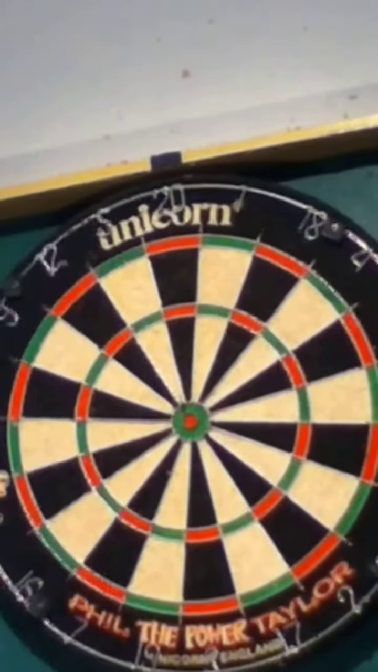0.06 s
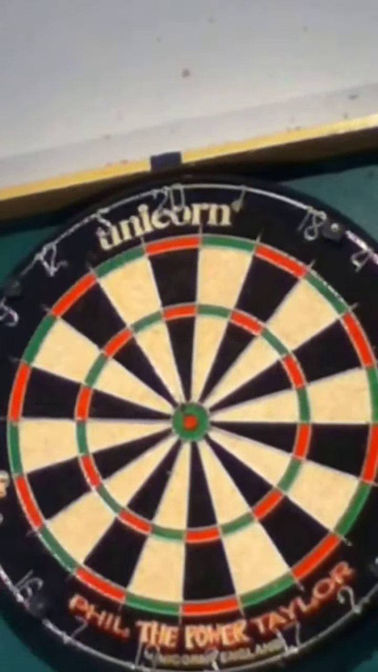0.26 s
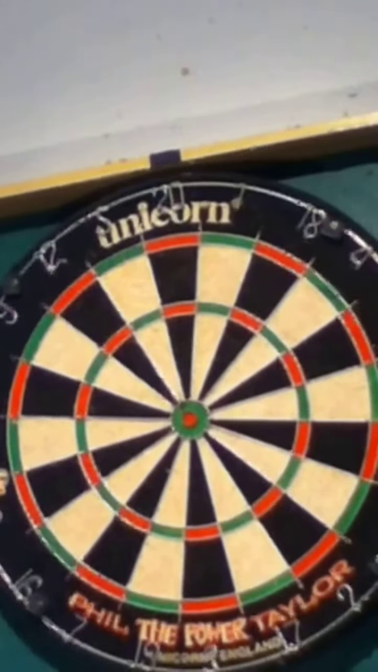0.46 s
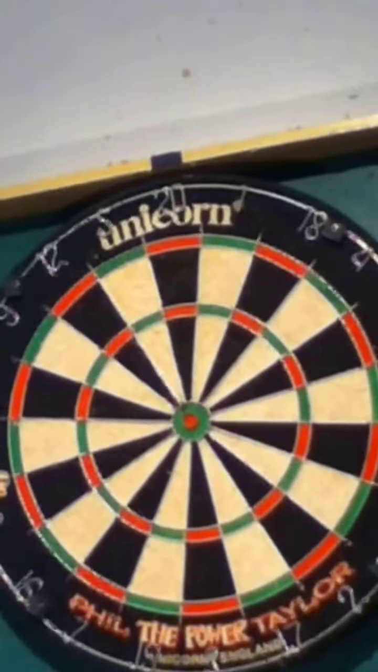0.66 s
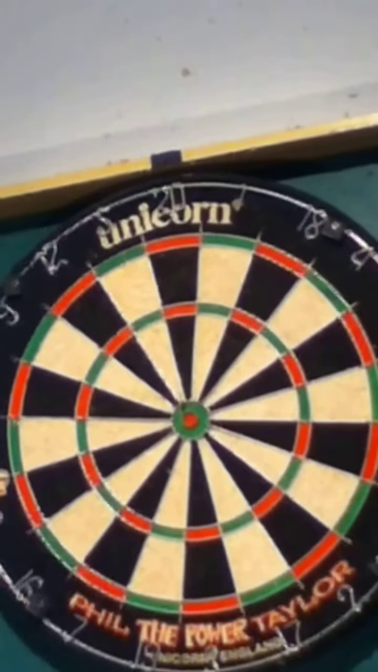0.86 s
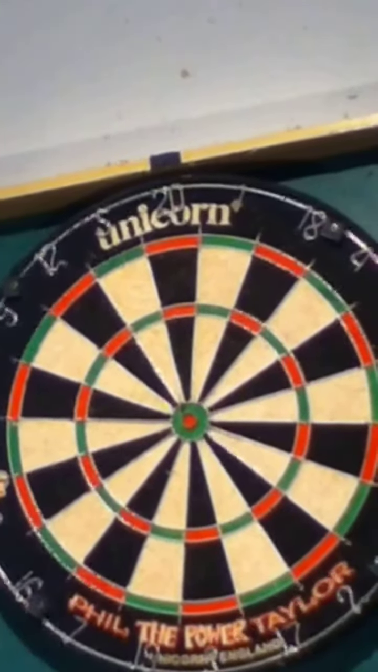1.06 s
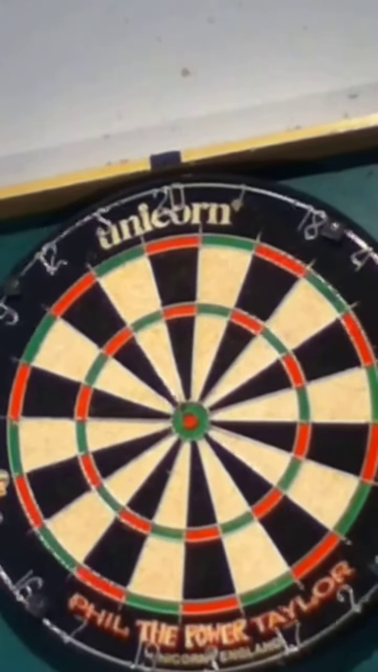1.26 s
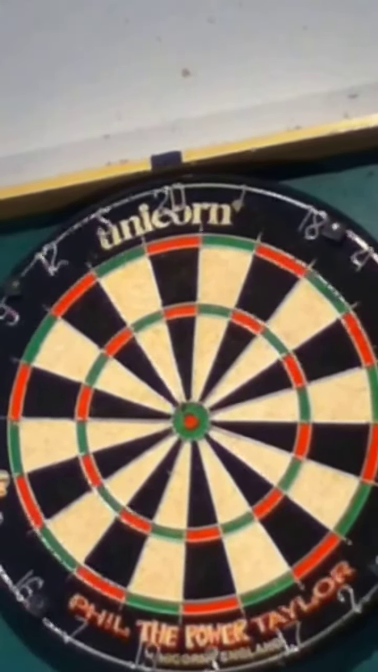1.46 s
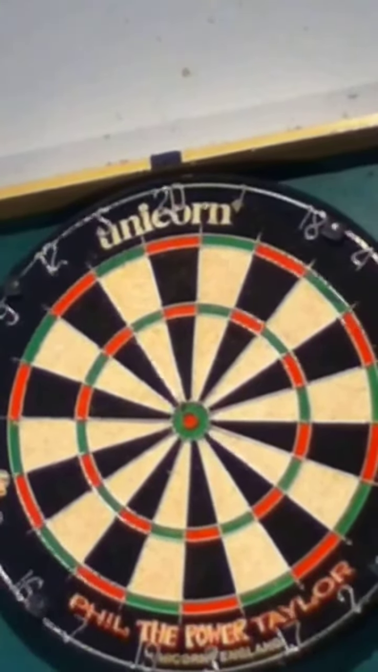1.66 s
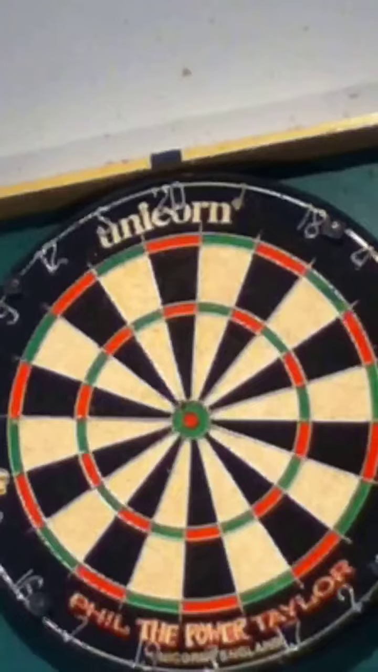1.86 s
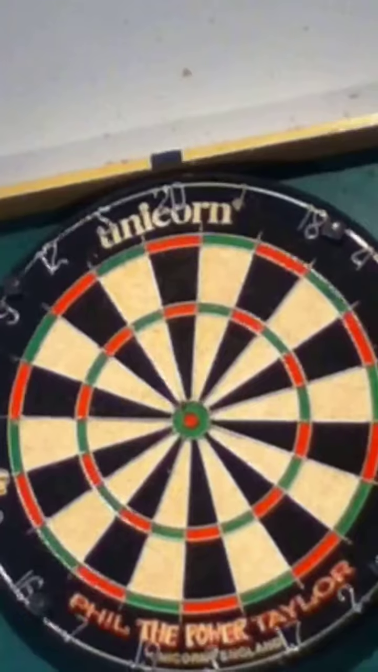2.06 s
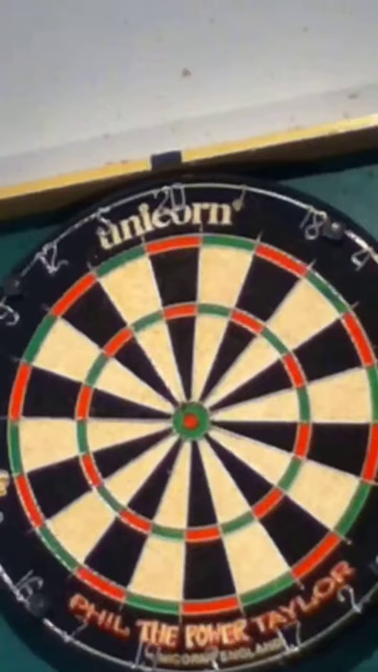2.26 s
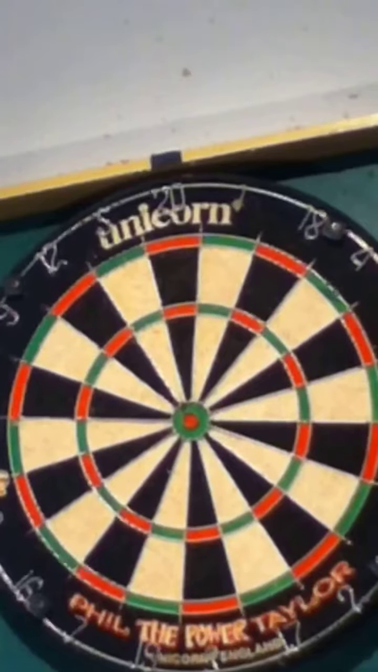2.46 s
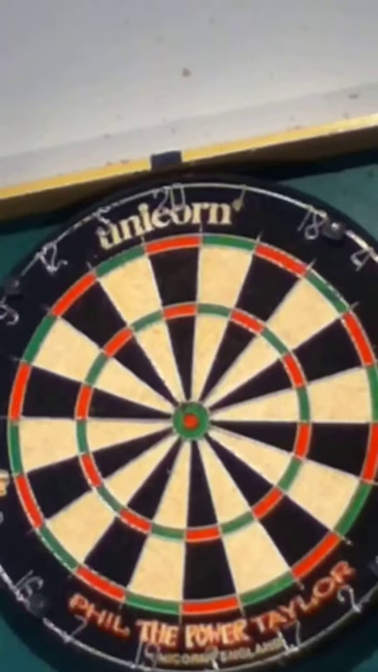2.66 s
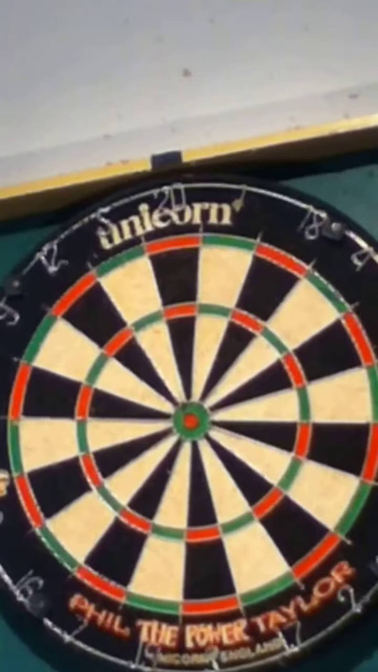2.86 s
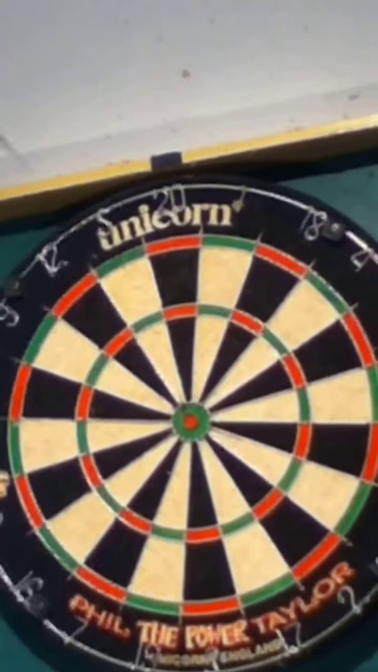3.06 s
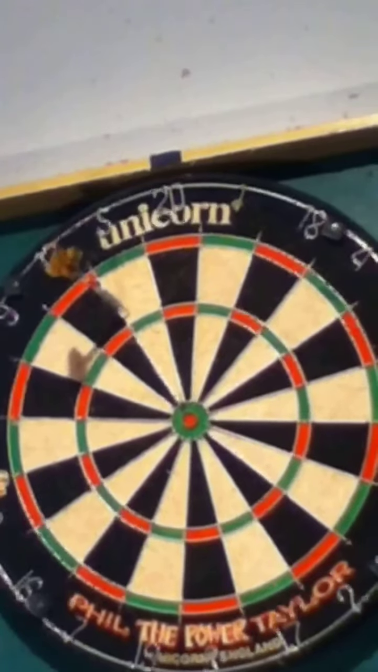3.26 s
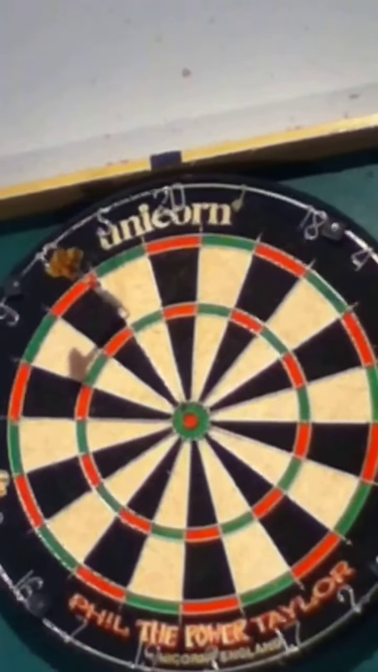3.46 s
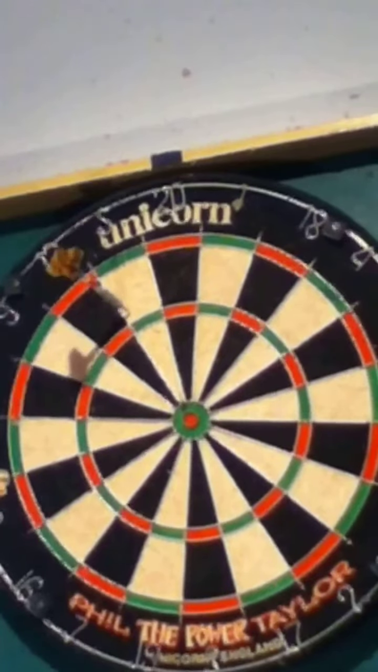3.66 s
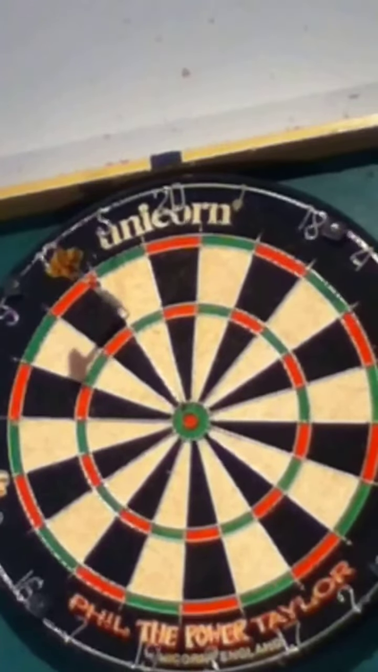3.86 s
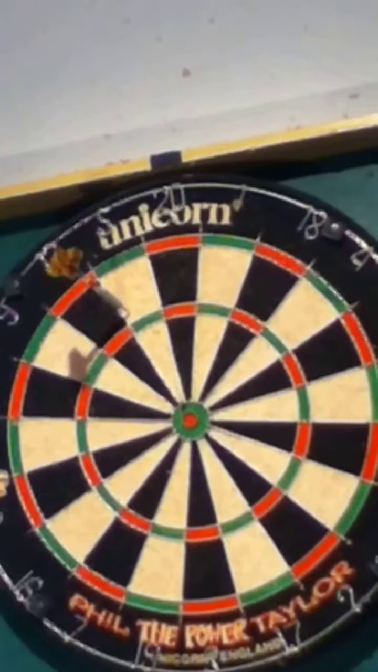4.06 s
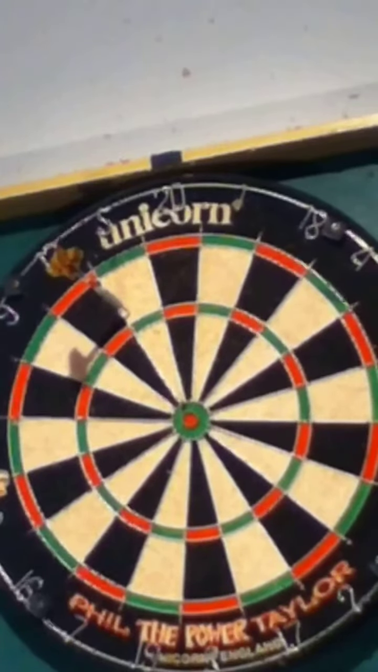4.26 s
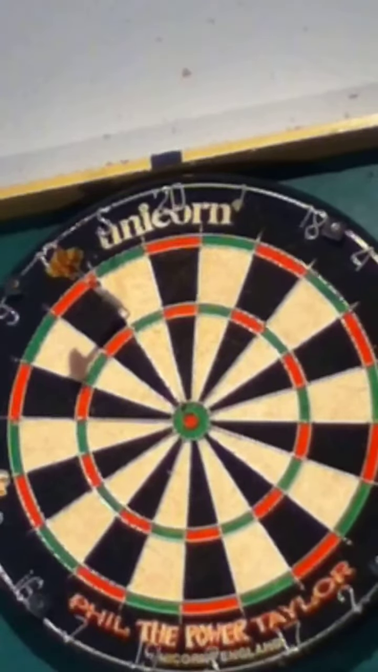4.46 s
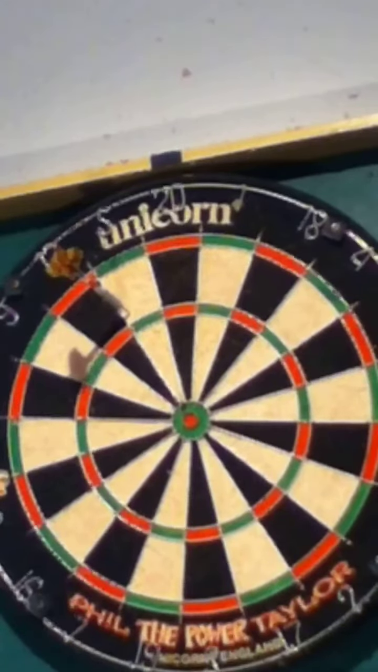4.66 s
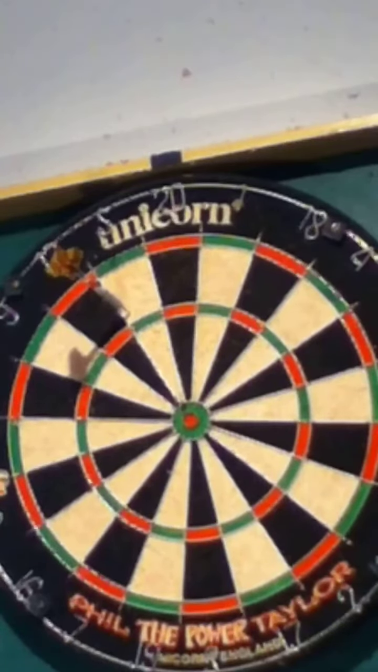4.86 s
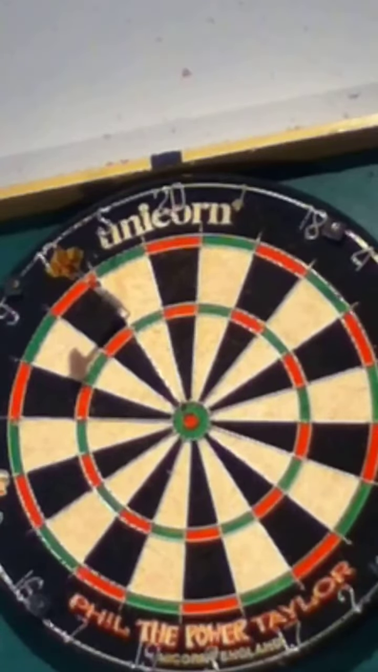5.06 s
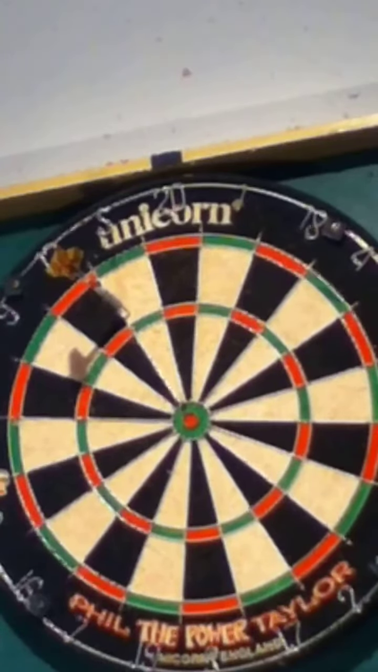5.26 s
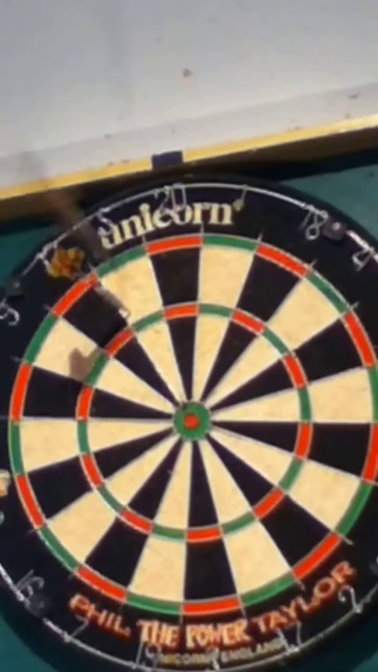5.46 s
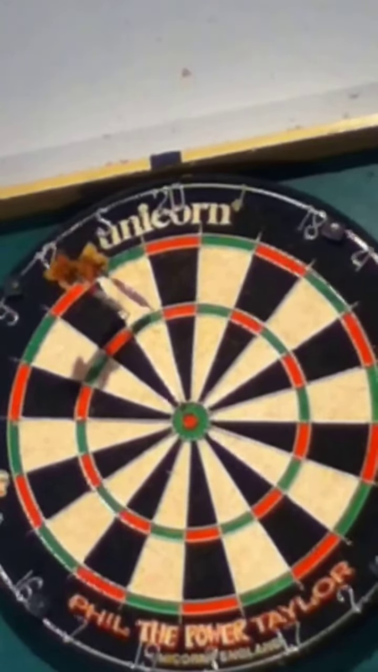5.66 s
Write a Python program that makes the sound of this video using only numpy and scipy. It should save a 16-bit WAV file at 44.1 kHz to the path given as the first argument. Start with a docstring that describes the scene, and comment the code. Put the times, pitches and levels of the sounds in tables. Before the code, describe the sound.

A small home room with one microphone and a steady soft hiss. Spare darts clink faintly while a sole shuffles on the floor. Dull heel thumps follow in the quiet. A dart hits the bristle board with a short crackling knock, then a light clink. After a pause, a stamp leads straight into a louder, brighter metallic clatter as the next dart strikes the one already there. Short room echo follows.

```python
"""A small room at home, where darts are thrown at a bristle board, heard by one microphone.
One dart crackles into the board, the next clatters against it: uneven clicks, then a blow that rings the board.
Spare darts clink in the hand (struck ringing tones); the thrower stamps (pressure swings and slaps) and
shuffles (grainy friction noise), with soft rustles of cloth. The room answers with a few clear echoes and
a short tail of fading noise, over a steady hiss."""
import sys
import numpy as np
from scipy import signal
from scipy.fft import rfft, irfft
from scipy.io import wavfile

SR = 44100
rng = np.random.default_rng(int(sys.argv[2]) if len(sys.argv) > 2 else 0)


def natural_amplitude(level_db):
    """Convert a level in decibels to a linear amplitude factor, elementwise."""
    exponent = np.asarray(level_db, float) / 20
    return 10 ** exponent


def to_wav(s):
    """Save 16-bit WAV."""
    ch = np.atleast_2d(s).T  # columns
    pcm = np.round(np.clip(ch, -1, 1) * 32767)  # PCM
    wavfile.write(sys.argv[1], SR, pcm.astype(np.int16))


N = 252252  # length of the scene in samples

# Darts landing: first_touch_s, crackle_db, time_to_full_stop_ms, thump_db, thump_contact_ms
DART_LANDINGS = [(3.259, -27, 4.0, -21.5, 0.86), (5.614, -13.5, 1.01, -23.5, 0.71)]
# Crackle of a point going into the fibres: pitch_hz, level_db (per Hz)
FIBRE_COLOUR = [(500, -23), (1000, -1.5), (2000, -7.5), (2300, -19), (2620, -5.5), (3300, -21.5),
                (4400, -16.5), (6000, -27), (7500, -15.5), (9000, -20), (12000, -29), (16000, -40)]
# Crackle of barrel on barrel: pitch_hz, level_db (per Hz)
CLATTER_COLOUR = [(410, -22), (700, -5.5), (748, -14.5), (1290, 1), (2150, -7.5), (3420, -8.5),
                  (4170, -5.5), (5220, -13), (7560, -4), (15200, -22), (16500, -60)]
# Ringing tones of the board and its backing: pitch_hz, level_db, fall_by_60_db_s
BOARD_TONES = [(262.2, -11, 0.39), (335, -9, 0.13), (400, -31, .06), (462.6, 2.5, 0.1), (498, -12, 0.088),
               (718, -2, 0.061), (960, -17, 0.072), (1160, -8, 0.042), (1240, -8, .04), (1630, -7, .03),
               (2040, -10, 0.023), (2600, -4, 0.055), (4450, -15, .03)]

# Clinks of dart against dart, and at 5.6097 s a faint, soft tick just ahead of the loud clash:
# start_s, level_db, clink_place (0-1 along the barrel), room_db
DART_CLINKS = [(0.1278, -33, 0.33, -27), (0.1345, -40, .15, -31), (.149, -29.5, .8, -35),
               (0.1593, -31, .78, -38), (.46, -25.5, 1, -31), (0.4643, -32, 1, -36), (3.092, -49, 0.2, -23),
               (3.097, -42.5, 0.27, -24), (3.5847, -31.5, 0.76, -30), (3.592, -38.5, 0.38, -27),
               (5.1669, -50, 0.56, -25), (5.6097, -45, .6, -26), (5.6143, -15.5, .8, -28),
               (5.6176, -20.5, 0.57, -26.5)]
# Ringing tones of a metal dart: pitch_hz, level_db, fall_by_60_db_s,
# swing_place (0-1 along the barrel, where the tone swings most)
DART_TONES = [(1560, 0, 0.022, 0.02), (1900, -5, 0.022, 0.32), (3470, -3, 0.017, 0.14),
              (3990, -1.5, 0.013, 0.38), (4420, 1.5, 0.013, 0.69), (4860, 3.5, 0.0034, 0.48),
              (5530, 1, 0.0064, 0.44), (7070, 2, 0.0059, 0.77), (7780, -1, 0.011, 0.62),
              (8430, -3, 0.017, 0.96), (9160, -2, 0.0042, 0.9), (13200, -10, .004, .95)]
OFF_PLACE_DB = -31.5  # change for a clink one barrel length from swing_place; goes with distance squared

# Heel on the floor: start_s, push_db, sole_slap_db, grit_tick_db
HEEL_STEPS = [(0.2132, -28.5, -23.5, -60), (0.218, -22.5, -39, -60), (1.4976, -31.5, -33, -60),
              (1.575, -41.5, -43, -70), (1.8208, -17.5, -22.5, -40), (2.0030, -15.5, -20, -40),
              (2.8911, -17, -22, -14), (5.5103, -16, -20, -38)]
# Colour of the sole's slap: pitch_hz, level_db (per Hz)
SOLE_COLOUR = [(200, -11), (500, -1.5), (1100, -2), (1700, -8.5), (2500, -14.5), (4000, -21.5), (8000, -35),
               (14000, -51)]
# Contact time of a 0 dB step, and its change per dB: softer steps touch more briefly
HEEL_MS, HEEL_MS_PER_DB = 3.23, 0.028

# Low tones of the room: pitch_hz, level_db, fall_by_60_db_s
ROOM_TONES = [(102.4, -44.5, 0.39), (135.5, -43.5, 0.19), (162.3, -45.5, 0.24), (203.3, -49, 0.3),
              (322.4, -56.5, 0.25)]
# Delay of each echo: delay_ms
ECHO_DELAYS = [3.6, 6.3, 7.7, 12.7, 15.8, 20.0, 23.0, 29.6, 37.2, 47.3, 53.4]
# Each echo in turn, off hard walls or soft furniture: level_db, dulled_above_hz
ECHO_SURFACES = [(-11.5, 1300), (-7, 830), (-24, 3200), (-13, 400), (-16.5, 3000), (-16.5, 980),
                 (-14, 1700), (-17, 1500), (-11, 1200), (-20, 240), (-13.5, 290)]
# How long the room's tail lasts: pitch_hz, fall_by_60_db_s
TAIL_TIMES = [(70, 0.29), (160, 0.44), (420, 0.32), (1100, .24), (2900, 0.23), (7700, .24), (14000, 0.14)]

# Sole dragged over the floor: start_s, pressure_db, speed (0-1)
SOLE_DRAG = [(0, -57.5, 0.83), (.05, -58.5, 0.7), (.11, -67, .7), (.25, -47, 0.55), (.32, -48, 0.7),
             (.385, -51.5, 0.97), (.45, -50.5, 0.74), (.53, -42.5, 0), (.62, -46, 0.23), (.77, -48.5, 0.4),
             (.835, -57, 0.6), (0.921, -72, .4)]
# Broad resonances of sole and floor: low_hz, high_hz, slow_db, gain_at_full_speed_db
FRICTION_BANDS = [(400, 696, -5.5, 4.5), (890, 2450, 0, 0.1), (2420, 5570, -7.5, 7),
                  (6060, 7640, -29.5, 33.5), (8400, 11400, -18.5, 9)]
# Cloth stirring: middle_s, level_db, length_s, low_hz, high_hz
CLOTH_RUSTLES = [(1.105, -56.5, .04, 400, 7860), (1.302, -55, 0.016, 350, 885),
                 (2.814, -56.5, 0.019, 4000, 9000), (5.177, -56, .025, 1500, 10000),
                 (5.363, -56.5, 0.058, 1000, 13000)]
# Colour of the steady background: pitch_hz, level_db (per Hz)
HISS_COLOUR = [(15, -24), (25, -15), (38, -11), (76, -5.5), (134, -1), (256, -4.5), (285, -7), (309, -8),
               (624, -13), (775, -14.5), (840, -14.5), (1190, -16.5), (9070, -20.5), (14800, -24),
               (16000, -36.5)]


def rms_one(x):
    """Scale a sound to an average strength (rms) of 1."""
    return x / np.sqrt(np.mean(x ** 2) + 1e-20)


def at_hz(points, hz):
    """Read a (Hz, value) table between its points, on a logarithmic pitch scale."""
    table = np.array(points)
    return np.interp(np.log(hz + 1), np.log(table[:, 0]), table[:, 1])


def colour(x, spectrum):
    """Filter by a spectrum with minimum phase, so that nothing sounds early."""
    size = 8192
    level_db = at_hz(spectrum, np.arange(size // 2 + 1) * SR / size)
    # Folding the cepstrum onto positive time gives minimum phase
    cepstrum = irfft(np.log(natural_amplitude(level_db)))
    cepstrum[1:size // 2] *= 2
    cepstrum[size // 2 + 1:] = 0
    response = irfft(np.exp(rfft(cepstrum)))
    return signal.fftconvolve(x, response / np.linalg.norm(response))[:len(x)]


def band(x, low_hz, high_hz):
    """Let through only the pitches between two limits (Butterworth band-pass)."""
    sos = signal.butter(2, [low_hz, min(high_hz, 0.45 * SR)], "band", fs=SR, output="sos")
    return signal.sosfilt(sos, x)


def steep_high_pass(x, cut_hz):
    """Remove the bass below a limit."""
    return signal.sosfilt(signal.butter(6, cut_hz, "high", fs=SR, output="sos"), x)


def ring(clicks, hz, t60):
    """A unit click sets a sine of height 1 ringing; it falls by 60 dB in t60 seconds."""
    shrink = natural_amplitude(-60 / (t60 * SR))  # per sample
    turn = 2 * np.pi * hz / SR  # radians per sample
    return signal.lfilter([0, np.sin(turn)], [1, -2 * shrink * np.cos(turn), shrink ** 2], clicks + 1e-18)


def add(track, s, sound):
    """Mix a sound into a track at a time in seconds."""
    at = round(s * SR)
    track[at:at + len(sound)] += sound[:N - at]


def contact_phase(ms):
    """Count from 0 to 1 over the time that two bodies touch."""
    return np.arange(0, 1, 1000 / (ms * SR))


def crackle(ms, spike_db):
    """Dense uneven clicks that hold for a moment and then die away."""
    t = np.arange(SR // 10) / SR
    grains = rng.standard_normal(len(t)) * natural_amplitude(spike_db * rng.exponential(1, len(t)))
    return rms_one(grains) * np.exp(-(1000 * t / ms) ** 2)


def flicker(rate):
    """Wander at random with a spread of about 1, through `rate` new values a second."""
    knots = rng.standard_normal(int(N / SR * 100) + 2)
    return np.interp(np.arange(N) / SR * rate, np.arange(len(knots)), knots)


def tail(dry, wet_db, rise_ms):
    """Scattered reflections of the room: noise that builds up, then dies band by band."""
    t = np.arange(SR // 2) / SR
    response = 0
    edges = 60 * 2 ** np.arange(0, 8.6, 0.5)  # half-octave bands
    for low, high in zip(edges, edges[1:]):
        fall = natural_amplitude(-60 * t / at_hz(TAIL_TIMES, np.sqrt(low * high)))
        response = response + band(rng.standard_normal(len(t)), low, high) * fall
    response *= 1 - np.exp(-(1000 * t / rise_ms) ** 2)
    return natural_amplitude(wet_db) * signal.fftconvolve(dry, response)[:N]


def landings():
    """The dart crackles in, then its weight stops against the board and sets it ringing."""
    crackles, crack, force = np.zeros((3, N))
    for landing, spectrum in zip(DART_LANDINGS, [FIBRE_COLOUR, CLATTER_COLOUR]):
        s, crackle_db, stop_ms, thump_db, contact_ms = landing
        stop_s = stop_ms / 1000
        grains = crackle(14.3, spike_db=2.5)
        # Resistance grows until the dart stops
        grains *= np.clip(0.35 + 0.65 * np.arange(len(grains)) / SR / stop_s, 0, 1)
        add(crackles, s, natural_amplitude(crackle_db) * colour(grains, spectrum))
        # One sharp crack of the same colour, to be heard through the room only
        add(crack, s, natural_amplitude(crackle_db) * colour(signal.unit_impulse(SR // 10), spectrum))
        phase = contact_phase(contact_ms)
        blow = phase * np.exp(-7 * phase)
        add(force, s + stop_s, natural_amplitude(thump_db) * blow / blow.sum())
    force = steep_high_pass(force, 235)  # the board is too small to radiate bass
    board = sum(natural_amplitude(db) * ring(force, hz, t60) for hz, db, t60 in BOARD_TONES)
    knock = natural_amplitude(31) * force
    room = tail(crack, -5, 17.0) + tail(force, 4.5, 13.0) + tail(board, -34.0, 3.8)
    return crackles + board + knock + room


def clinks():
    """Each clink sets off a dart's tones, most those that swing at its place; a bare tick opens it."""
    s, clink_db, clink_place, room_db = np.transpose(DART_CLINKS)
    at = (s * SR).astype(int)
    near_and_far, ticks = np.zeros((2, N)), np.zeros(N)
    chance_db = rng.normal(0, 1, (len(s), len(DART_TONES)))
    for k, (hz, tone_db, t60, swing_place) in enumerate(DART_TONES):
        place_db = OFF_PLACE_DB * (clink_place - swing_place) ** 2
        clicks = np.zeros((2, N))
        # Neighbouring tones start in opposite directions
        clicks[0, at] = natural_amplitude(clink_db + tone_db + place_db + chance_db[:, k]) * (-1) ** k
        clicks[1, at] = clicks[0, at] * natural_amplitude(room_db)
        near_and_far = near_and_far + ring(clicks, hz, t60)
    near, far = near_and_far
    ticks[at] = natural_amplitude(clink_db + 13.0)
    for low_hz, high_hz in [(1700, 9800), (1500, 11000), (1400, 11400)]:
        ticks = band(ticks, low_hz, high_hz)
    return near + ticks + tail(far, 0, 1.0)


def steps():
    """The floor is pushed down and springs back harder: a pressure swing, its echoes and room tones.
    The slap of the sole faces away and arrives mostly through the room."""
    push, slap, grit = np.zeros((3, N))
    for s, push_db, slap_db, tick_db in HEEL_STEPS:
        phase = contact_phase(HEEL_MS + HEEL_MS_PER_DB * push_db)
        swing = np.sin(2 * np.pi * phase) * np.sin(np.pi * phase)
        add(push, s, natural_amplitude(push_db) * swing * 2 * np.sqrt(phase))  # the second half is the stronger
        add(slap, s, natural_amplitude(np.array([slap_db])))
        add(grit, s, -natural_amplitude(np.array([tick_db])))
    slap = colour(slap, SOLE_COLOUR)
    out = push + band(grit, 2300, 6550) + natural_amplitude(-0.5) * slap
    out = out + tail(push, -39.5, 28.0) + tail(slap, -13, 2.2)
    for delay_ms, (echo_db, cut_hz) in zip(ECHO_DELAYS, ECHO_SURFACES):
        dulled = signal.sosfilt(signal.butter(1, cut_hz, fs=SR, output="sos"), push)
        add(out, delay_ms / 1000, natural_amplitude(echo_db) * dulled)
    return out + sum(natural_amplitude(db) * ring(push, hz, t60) for hz, db, t60 in ROOM_TONES)


def drag():
    """Uneven grains of friction in the resonances of sole and floor; speed brings out the upper ones."""
    s, pressure_db, speed = np.transpose(SOLE_DRAG)
    t = np.arange(N) / SR
    out = 0
    shared_flicker_db = 0.9 * flicker(29.5)
    for low_hz, high_hz, slow_db, fast_db in FRICTION_BANDS:
        grains = rng.standard_normal(N) * natural_amplitude(2.0 * np.minimum(rng.exponential(1, N), 4))
        level_db = np.interp(t, s, pressure_db + slow_db + fast_db * speed)
        level_db = level_db + shared_flicker_db + 1.6 * flicker(25.7)
        # A second, wider filter steepens the far slopes
        grains = band(band(grains, low_hz, high_hz), 0.59 * low_hz, 1.66 * high_hz)
        out = out + rms_one(grains) * natural_amplitude(level_db) * (t < s[-1])
    return out


def rustles():
    """Stirring cloth: soft puffs of noise that swell and fade."""
    t = np.arange(N) / SR
    out = 0
    for s, db, length_s, low_hz, high_hz in CLOTH_RUSTLES:
        puff = np.exp(-((t - s) / length_s) ** 2)
        out = out + natural_amplitude(db) * puff * rms_one(band(rng.standard_normal(N), low_hz, high_hz))
    return out


def hiss():
    """Microphone noise and the low murmur of the house: steady coloured noise."""
    noise = colour(rng.standard_normal(N + SR), HISS_COLOUR)
    return natural_amplitude(-55) * rms_one(noise[SR:])  # skip the first second, while the filter fills


def scene():
    """All sources meet at one microphone, whose bass is cut; its hiss comes on top, alike on both sides."""
    sound = landings() + clinks() + steps() + drag() + rustles()
    sound = steep_high_pass(sound, 90.6) + hiss()
    return np.array([sound, sound])


def top_cut(x):
    """Nothing passes above the cut-off."""
    return signal.sosfilt(signal.butter(12, 16650, fs=SR, output="sos"), x)


def record(dry):
    """Turn the finished mix into the stored sound."""
    return top_cut(dry)


dry = scene()
out = record(dry)
to_wav(out)
```